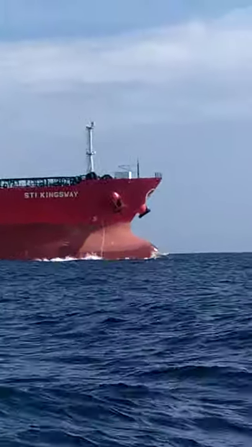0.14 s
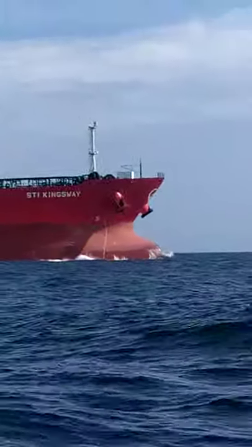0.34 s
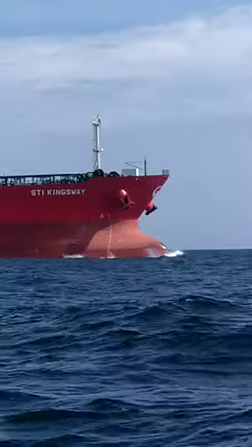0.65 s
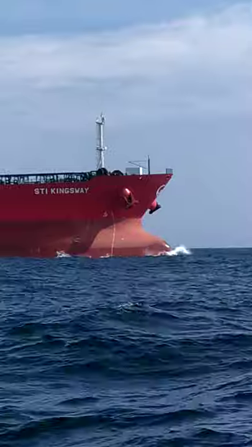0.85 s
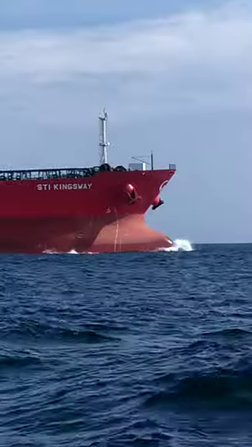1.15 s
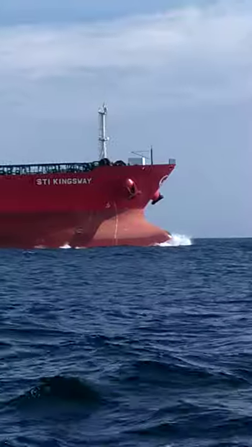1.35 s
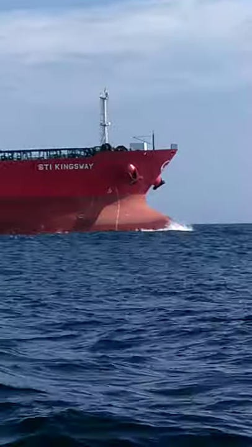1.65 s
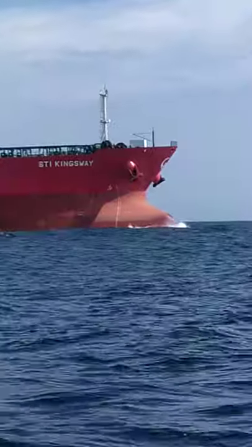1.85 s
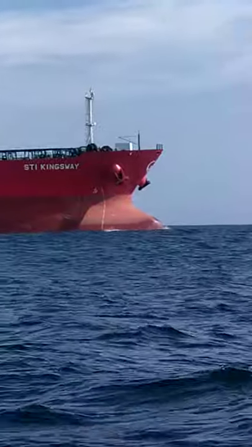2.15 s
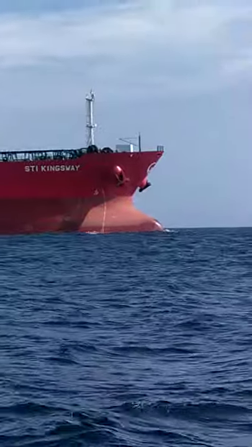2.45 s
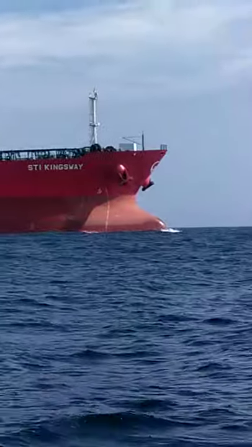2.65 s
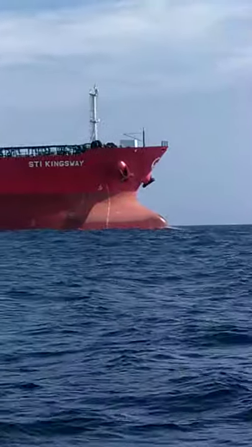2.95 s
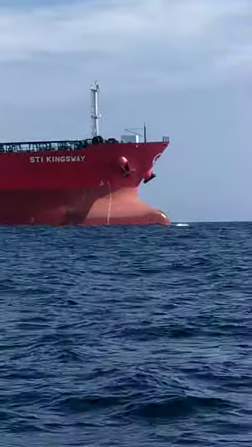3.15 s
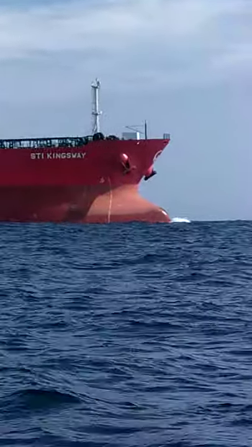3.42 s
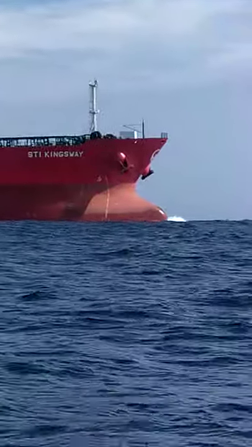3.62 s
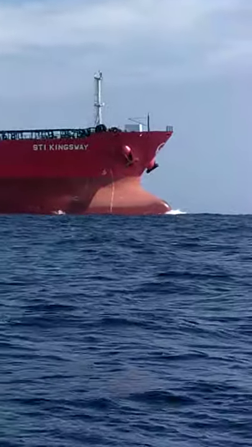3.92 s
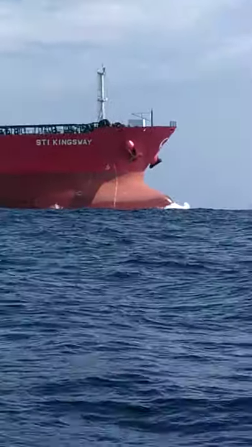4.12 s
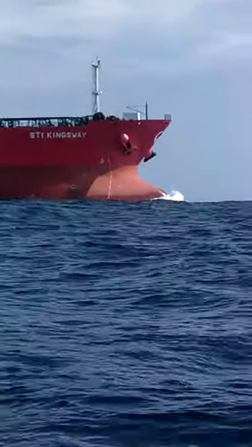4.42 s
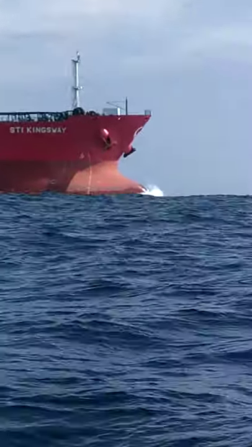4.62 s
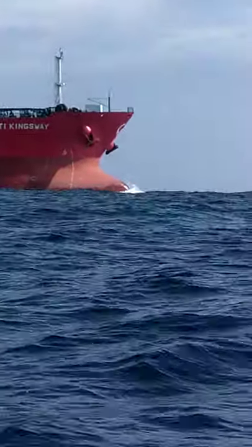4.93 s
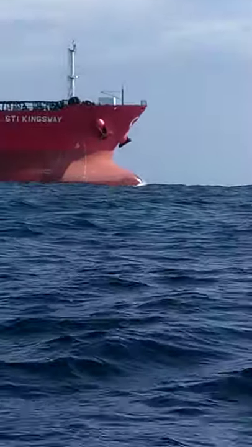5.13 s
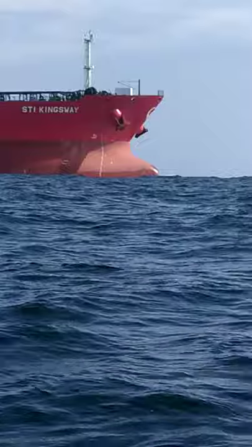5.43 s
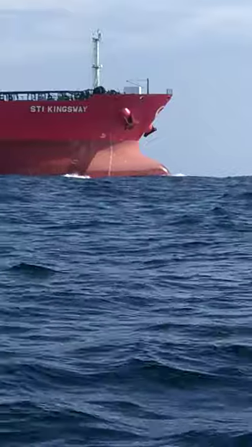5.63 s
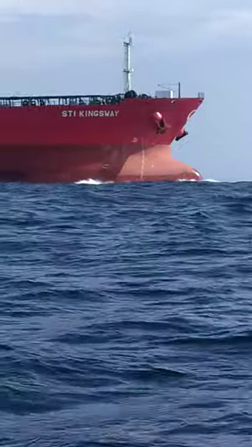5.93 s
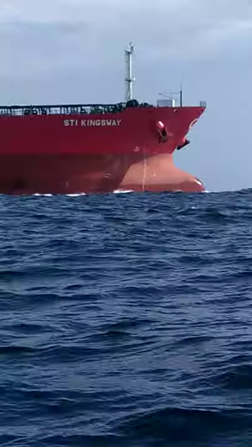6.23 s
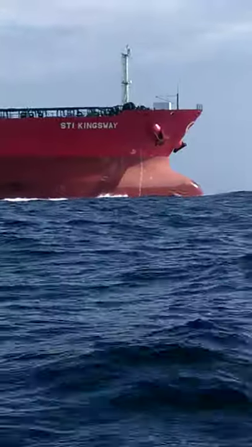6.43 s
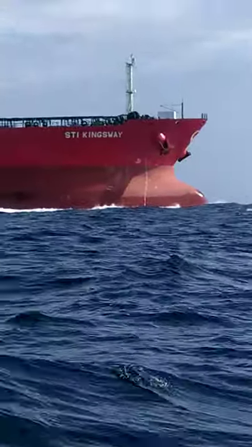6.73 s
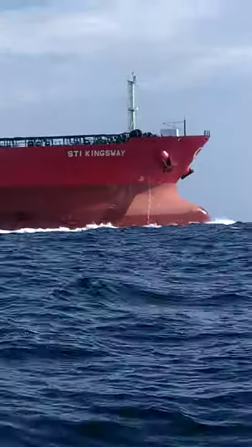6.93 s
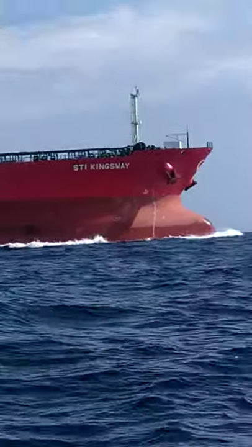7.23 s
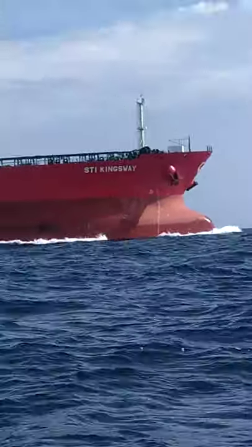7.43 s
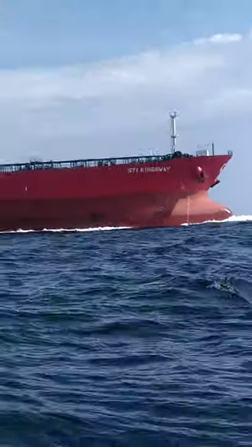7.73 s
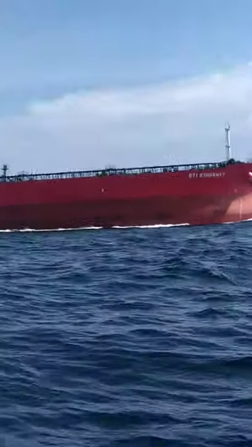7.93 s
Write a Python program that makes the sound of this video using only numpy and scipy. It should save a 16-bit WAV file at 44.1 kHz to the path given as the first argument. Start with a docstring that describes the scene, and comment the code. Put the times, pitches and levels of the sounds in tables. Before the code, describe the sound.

A tanker's deep horn sounds two long blasts across open sea while wind buffets the microphone and a small boat engine drones over hissing water.

```python
"""Open sea, heard from a small motor boat: a tanker sounds two long horn blasts, each a sum of harmonics.
One blast is under way at the start and the other still sounds at the end. The engine drones in low tones
and its knocks ring damped resonances; filtered noise makes water hiss along the hull. Wind turbulence
buffets two microphone ports, mostly one at a time; surges pin a capsule now and then and gain control ducks
that channel. Pops, drops of spray, one splash and a squeaking loose panel come and go."""
import sys
import numpy as np
from scipy import signal
from scipy.fft import rfft, irfft, next_fast_len
from scipy.io import wavfile
from scipy.ndimage import uniform_filter1d

SR = 44100
rng = np.random.default_rng(int(sys.argv[2]) if len(sys.argv) > 2 else 0)


def materialize(psi):
    """Save the field psi as 16-bit PCM at rate SR to the path in sys.argv[1].

    A 1-D psi becomes a single channel; in a 2-D psi each row is a channel.
    """
    bounded = np.clip(np.atleast_2d(psi).T, -1, 1)
    quanta = np.round(bounded * 32767).astype(np.int16)
    wavfile.write(sys.argv[1], SR, quanta)


N = 355887

# Levels are source settings, before placement and the microphone. Port 0 is left, 1 is right.
# Horn blasts: start_s, end_s
HORN_BLASTS = [(-1.0, 2.62), (5.0, 9.0)]
# Horn harmonics: multiple, level_db
HORN_HARMONICS = [(1, 0), (2, -9), (3, -20.5), (4, -30.5), (5, -30.5), (6, -38)]
# Horn partials swimming as sound crosses the water: time_s, level_db,
# second_db and third_db (harmonics above their usual share)
HORN_CROSSING = [(0, -13, 0, 0), (.3, -5, 0, -5), (.65, -5.5, -4, 2), (1.0, -10.5, 0, -3),
                 (1.4, -6, -17, -19), (1.8, -11.5, -6, 2.5), (2.1, -3.5, -5.5, 5), (2.4, -8.5, -13, -5),
                 (2.6, -6.5, -10.5, -6), (5.0, -11.5, 4, -2), (5.3, -4.5, -2, -10), (6.1, -8.5, 0, -4),
                 (6.9, -8.5, -1.5, -5), (7.3, -5.5, -4, -1), (7.7, -9, 0.8, -1), (8.07, -4.5, -3, -5)]
HORN_HZ, HORN_RISE_DB_PER_S, HORN_FALL_DB_PER_S = 135.65, 808, 240

# Engine speed as the boat climbs and drops off the swell: time_s, firings_per_s
ENGINE_SPEED = [(0, 67.3), (1, 66.9), (1.25, 60.5), (1.6, 60.5), (1.95, 67.4), (2.72, 65.7), (3, 63.7),
                (3.38, 63.5), (3.68, 65.8), (3.9, 66.2), (4.33, 65.7), (4.5, 64), (4.8, 57.1), (5.03, 57.2),
                (5.33, 59.6), (5.58, 60.1), (5.85, 61.1), (6.45, 60.5), (6.65, 57.5), (6.95, 43),
                (7.25, 48.7), (7.75, 51.9), (8.07, 52.5)]
# Engine parts: time_s, load_db, block_knock_db, hatch_ring_db
ENGINE_LEVELS = [(0, -19.5, -30.5, -39), (.6, -16, -28.5, -37), (1.15, -17.5, -28, -58),
                 (1.6, -19.5, -32.5, -38), (2.1, -16, -24.5, -53), (2.45, -13, -33.5, -57),
                 (2.75, -17, -31, -44), (3.1, -24, -29, -55), (3.3, -22, -29, -52),
                 (3.55, -18.5, -29.5, -48), (3.8, -17, -30, -46), (4.05, -15, -29.5, -42),
                 (4.4, -24, -34, -48), (4.7, -22, -33, -39), (4.95, -22, -30, -39.5),
                 (5.2, -20, -30.5, -34), (5.6, -19, -32, -35), (5.8, -23.5, -31.5, -37),
                 (6.4, -28, -32.5, -40), (6.8, -24, -46, -53), (7.15, -24, -32.5, -41),
                 (7.6, -33, -33, -42), (7.9, -30, -28.5, -38), (8.07, -12, -45, -50)]
# Low engine tones beside the boom: multiple (of the firing rate), level_db (re load)
ENGINE_TONES = [(1, 1.5), (3, -18), (4, -37)]
# Cowling tick swelling and fading: time_s, relative_level_db
COWLING_TICK = [(0.0, -39), (1.26, -45), (1.41, -38.5), (2.63, -40.5), (2.79, -33.5), (2.94, -39),
                (3.14, -42), (3.26, -33), (3.35, -43), (3.64, -38), (4.16, -41), (4.4, -36), (4.72, -46.5),
                (4.92, -41.5), (5.57, -45.5), (5.72, -37.5), (6.05, -37), (6.12, -38), (6.22, -36.5),
                (6.35, -44.5), (6.63, -45), (6.65, -70), (6.79, -69), (6.97, -54), (7.35, -43), (7.48, -57),
                (7.55, -45), (7.91, -42.5), (8.02, -59), (8.07, -42)]
# Resonances of the engine block: frequency_hz, width_hz, level_db
BLOCK_MODES = [(347, 64, -3), (400, 62, 1), (462, 60, 0.5), (530, 60, -6), (600, 70, -6), (710, 95, -0.5),
               (775, 74, -9)]
# Resonances of the hatch: frequency_hz, width_hz, level_db
HATCH_MODES = [(1368, 45, 0), (1312, 55, 0), (1255, 50, -1)]
# Resonances of the deck boards: frequency_hz, width_hz, level_db
DECK_MODES = [(1080, 55, -3), (1170, 26, 0), (1577, 67, -8), (1625, 62, 5)]
# Resonances of the cowling: frequency_hz, width_hz, level_db
COWLING_MODES = [(2213, 62, 0), (2275, 50, -8)]
# The exhaust pipe booms when twice the firing rate meets its resonance
BOOM_DB, BOOM_HZ, BOOM_WIDTH_HZ = -17, 117.2, 13.8
HULL_CUT_HZ = 2200  # the hull muffles the engine above this
# For a while the deck boards hum along
DECK_FROM_S, DECK_TO_S, DECK_DB = 3.4, 4.21, -40.5
DECK_RISE_DB_PER_S, DECK_FALL_DB_PER_S = 14, 58

# Wind strength at the ports between gusts: time_s, level_db
WIND_STRENGTH = [(0, -12.5), (.6, -12), (1.0, -9.5), (1.5, -5.5), (1.9, -11), (2.3, -13), (2.9, -9),
                 (3.5, -18), (3.95, -14), (4.15, -12.5), (4.4, -13), (4.85, -16), (5.15, -10.5), (5.5, -17),
                 (5.85, -13.5), (6.3, -15), (6.7, -17), (7.3, -16), (8.07, -11.5)]
# Gusts that thump one port: peak_time_s, peak_db, port
PORT_GUSTS = [(.09, -1.5, 0), (.703, 1.5, 1), (.818, -6.5, 0), (.818, 2, 1), (.983, 0.5, 1), (1.083, -7, 1),
              (1.2, 3, 0), (1.292, 4.5, 0), (1.292, 3, 1), (1.407, 2, 1), (1.726, 2.5, 0), (1.826, 3.5, 1),
              (1.911, 3, 0), (2.16, -2, 0), (2.205, 1.5, 1), (2.325, -1.5, 1), (2.514, -2, 0),
              (2.629, -0.5, 0), (2.799, -4.5, 0), (2.903, -0.8, 0), (3.033, -11, 1), (3.133, -3, 1),
              (3.264, -1, 1), (3.367, -6.5, 0), (3.367, -2.5, 1), (3.622, 0.5, 0), (3.687, -10, 1),
              (3.806, -3.5, 0), (4.185, -1.5, 1), (4.33, -12, 1), (4.495, -16, 0), (4.495, -3, 1),
              (4.704, -6.5, 0), (5.453, -8, 1), (6.076, 0.5, 1), (6.136, -2.5, 0), (6.44, -6.5, 0),
              (6.899, -2, 1), (7.588, -2.5, 1), (7.912, -10, 0)]
# Spectrum of the wind rumble: frequency_hz, relative_db_per_hz
RUMBLE_SPECTRUM = [(8, 2.5), (25, 6.5), (60, 4.5), (110, 4), (200, -2.5), (400, -11), (800, -25),
                   (1600, -40), (4000, -57)]
WIND_WANDER_DB, WIND_WANDER_HZ = 4, 3.7
GUST_RISE_DB_PER_S, GUST_FALL_DB_PER_S = 150, 156

# Water along the hull: time_s, wash_db, spray_hiss_db
WATER_LEVELS = [(0, -25.5, -35), (.65, -25.5, -32), (1.1, -29.5, -37), (1.7, -30.5, -35),
                (2.0, -25.5, -33.5), (2.7, -27.5, -34.5), (3.35, -31, -35), (3.6, -27.5, -34.5),
                (4.1, -26, -33), (4.75, -32, -37), (5.3, -28.5, -34), (6.8, -33.5, -38.5),
                (7.4, -31, -37.5), (7.85, -29.5, -36), (8.07, -36, -39.5)]
# Spectrum of the wash: frequency_hz, relative_db_per_hz
WASH_SPECTRUM = [(300, -17), (480, 0), (620, -4), (750, -4), (950, -8), (1250, -3), (1450, -8.5),
                 (1650, -8), (1950, -8.5), (2300, -10.5), (2650, -18.5), (3300, -27.5), (5000, -55),
                 (9000, -62)]
# Spectrum of the spray hiss: frequency_hz, relative_db_per_hz
SPRAY_SPECTRUM = [(1760, -15), (3000, -5), (3930, -10.5), (4290, -11.5), (6210, -9), (10900, -14.5),
                  (13700, -21), (14600, -30), (15000, -43)]
# Left-right likeness of the water: frequency_hz, correlation
WATER_LIKENESS = [(250, 0.65), (1000, 0.95), (2000, 1), (4000, 0.047), (12000, 0.033)]

# Pressure surges that pin one capsule to its stop: start_s, length_ms, port
PRESSURE_SURGES = [(0.0484, 5.5, 0), (0.8576, 6.0, 0), (0.8755, 9.0, 0), (1.0616, 7.5, 0), (1.082, 13.0, 0),
                   (1.2112, 5.5, 0), (1.4866, 7.0, 0), (1.5914, 5.5, 0), (1.6747, 5.5, 0), (1.8194, 6.0, 1),
                   (1.8348, 10.5, 1), (1.9311, 6.0, 0), (2.1526, 6.0, 0), (2.187, 6.0, 0), (2.877, 5.5, 0),
                   (3.0107, 6.5, 0), (3.3065, 9.5, 0), (3.3743, 11.0, 0), (3.5559, 7.0, 0),
                   (3.6976, 7.0, 0), (3.7874, 6.0, 0), (3.962, 7.5, 0), (6.0732, 11.5, 1)]
# Sharp pops of air in one port: start_s, drive_db, port
AIR_POPS = [(0.8142, 3, 1), (0.8178, -3, 0), (0.6978, -3, 1), (0.823, 4, 1), (1.0337, 4, 0),
            (1.058, 5.5, 0), (1.1277, -3, 1), (1.139, -2, 1), (1.2565, 3, 1), (1.4335, 6, 1),
            (4.0883, 5, 0), (4.4668, 1, 1), (1.2975, 11, 0), (1.388, -3, 0), (1.4945, 12.5, 0),
            (1.731, 12, 0), (1.781, 9.5, 1), (1.852, 13, 1), (1.8577, 7, 0), (1.8743, 5, 1), (1.9032, 9, 0),
            (2.1601, 5, 0), (2.7695, -2, 0), (3.1431, 1.5, 1), (3.2668, 12, 1), (3.2688, 15, 1),
            (3.2722, 3, 1), (3.278, 5, 1), (3.3049, 13.5, 1), (4.173, 10, 1), (4.19, 6, 1), (4.232, -1, 1),
            (4.6903, 2, 0), (6.0567, 5, 1), (6.142, 11.5, 0), (6.8588, 7, 0)]
# Spray drops on deck: start_s, drive_db
SPRAY_DROPS = [(1.0959, -40), (2.167, -42), (3.3154, -30), (3.7045, -32), (3.8382, -26), (4.1704, -31),
               (5.005, -25), (5.1325, -22.5)]
# A sheet of spray comes over the side
SPLASH_FROM_S, SPLASH_TO_S, SPLASH_DB = 5.005, 5.14, -34
SPLASH_RISE_DB_PER_S, SPLASH_FALL_DB_PER_S = 500, 150

# Squeaks of a loose panel as the engine picks up: start_s, length_ms, pitch_hz, level_db, rattle_db
PANEL_SQUEAKS = [(7.059, 20, 1300, -36, -48), (7.102, 24, 1320, -39, -41), (7.15, 26, 1340, -31, -36),
                 (7.195, 20, 1320, -23.5, -28), (7.225, 24.6, 1325, -32, -38), (7.27, 22, 1350, -25.5, -36),
                 (7.343, 17, 1352, -28, -32), (7.368, 10, 1345, -30, -30), (7.383, 32, 1338, -26.5, -29),
                 (7.445, 32, 1352, -26, -28), (7.51, 17, 1340, -28.5, -31), (7.546, 13, 1345, -28, -33),
                 (7.57, 30, 1365, -25.5, -27), (7.625, 20, 1350, -33, -40), (7.659, 15, 1340, -36, -40),
                 (7.69, 25, 1335, -32, -35), (7.734, 23, 1330, -32, -32), (7.806, 25, 1320, -39, -30.5),
                 (7.873, 21, 1320, -43, -30), (7.928, 20, 1310, -42, -33)]
# Side tones of a squeak: multiple (of the pitch), relative_level_db
SQUEAK_SIDE_TONES = [(0.915, -4.0), (1.145, 1.0), (1.27, 0.0), (1.33, -5.0)]
# Resonances of the panel rattle: frequency_hz, width_hz, level_db
PANEL_MODES = [(1517, 70, -5), (1723, 79, -2), (1790, 110, -8), (1190, 110, -3)]
SQUEAK_RISE_DB_PER_S, SQUEAK_FALL_DB_PER_S, SQUEAK_THROB_DB = 2500, 1300, 2.5
SQUEAK_BEND_HZ_PER_DB = 2.0  # the pitch climbs as a squeak swells and sags as it dies

CAPSULE_STOP, CUTOFF_HZ = 1.25, 15600  # amplitude limit; edge of the final low-pass


def amp(db):
    """Decibel law: amplitude gain of a level in dB."""
    return 10 ** (np.asarray(db) / 20)


def rms_one(x):
    """Power normalisation: each channel scaled to rms 1."""
    return x / np.sqrt(np.mean(x ** 2, axis=-1, keepdims=True) + 1e-20)


def in_time(rows):
    """Linear interpolation: the columns of a curve table, one value a sample."""
    time_s, *columns = np.transpose(rows)
    return [np.interp(np.arange(N) / SR, time_s, column) for column in columns]


def at_hz(points, hz):
    """Logarithmic interpolation: a frequency table read on a log axis."""
    table_hz, values = np.array(points).T
    return np.interp(np.log(hz), np.log(table_hz), values)


def drift(rate_hz):
    """Slow random fluctuation: noise low-passed twice, of spread 1."""
    step = 40  # samples between drawn values
    pole = np.exp(-2 * np.pi * step * rate_hz / SR)
    noise = rng.standard_normal(N // step + 2002)
    slow = signal.lfilter([1], [1, -2 * pole, pole * pole], noise)[2000:]
    return np.interp(np.arange(N) / step, np.arange(len(slow)), rms_one(slow))


def tent(start_s, end_s, rise_db_per_s, fall_db_per_s):
    """Exponential growth and decay: in dB a straight rise to 0, a hold, a straight fall."""
    t = np.arange(N) / SR
    rise = rise_db_per_s * (t - start_s)
    fall = fall_db_per_s * (end_s - t)
    return np.minimum(0, np.minimum(rise, fall))


def resonate(x, modes):
    """Modal resonance: parallel damped modes, each passed twice so that rings swell softly."""
    out = 0
    for hz, width_hz, level_db in modes:
        pole = np.exp(-np.pi * width_hz / SR)
        section = [1, 0, -1, 1, -2 * pole * np.cos(2 * np.pi * hz / SR), pole * pole]
        ring = signal.sosfilt([section, section], x + 1e-18)
        out = out + amp(level_db) * rms_one(ring)
    return out


def coloured(spectrum, channels):
    """Spectral shaping: independent noises of a given spectrum, at rms 1."""
    size = next_fast_len(N)
    hz = np.maximum(np.fft.rfftfreq(size, 1 / SR), 1)
    white = rfft(rng.standard_normal((channels, size)))
    return rms_one(irfft(white * amp(at_hz(spectrum, hz)), size)[:, :N])


def band_noise(order, edges_hz):
    """Band-pass filtering: two independent channels of noise between two frequencies."""
    band = signal.butter(order, edges_hz, "band", fs=SR, output="sos")
    return rms_one(signal.sosfilt(band, rng.standard_normal((2, N))))


def placed(x, pan_db, lag_s):
    """Point-source localisation: left-over-right level, and the lag of the right channel."""
    right = np.interp(np.arange(N) - lag_s * SR, np.arange(N), x)
    return np.array([x * amp(pan_db / 2), right * amp(-pan_db / 2)])


def horn():
    """Harmonic series of a diaphragm tone; the air over the water makes each harmonic waver."""
    phase = 2 * np.pi * np.cumsum(HORN_HZ + 0.15 * drift(1.0)) / SR
    level_db, second_db, third_db = in_time(HORN_CROSSING)
    out = 0
    for start_s, end_s in HORN_BLASTS:
        shape_db = level_db + tent(start_s, end_s, HORN_RISE_DB_PER_S, HORN_FALL_DB_PER_S)
        for k, share_db in HORN_HARMONICS:
            waver_db = .35 * k * drift(2.5)
            swim_db = (k == 2) * second_db + (k == 3) * third_db
            gain = amp(shape_db + share_db + swim_db + waver_db)
            out = out + gain * np.sqrt(2) * np.sin(k * phase)
    return placed(out, pan_db=1.3, lag_s=-0.00022)


def engine():
    """Periodic excitation of resonances: firing tones, and uneven knocks ringing the boat's parts."""
    per_s, = in_time(ENGINE_SPEED)
    load_db, block_db, hatch_db = in_time(ENGINE_LEVELS)
    tick_db, = in_time(COWLING_TICK)
    cycles = np.cumsum(per_s + .08 * drift(3.0)) / SR  # firings so far

    boom_db = BOOM_DB - 10 * np.log10(1 + ((2 * per_s - BOOM_HZ) / BOOM_WIDTH_HZ) ** 2)
    low = amp(boom_db + 0.9 * drift(3.2)) * np.sqrt(2) * np.sin(4 * np.pi * cycles)
    for k, share_db in ENGINE_TONES:
        gain = amp(load_db + share_db + 2.6 * drift(8.3))
        low += gain * np.sqrt(2) * np.sin(2 * np.pi * k * cycles)

    fired = np.diff(np.floor(cycles), prepend=0)
    weak = np.floor(cycles) % 2  # every second firing is softer
    knocks = rms_one(fired * amp(-7.0 * weak + .6 * rng.standard_normal(N)))
    taps = rms_one(fired * amp(-9.0 * weak + 2.0 * rng.standard_normal(N)))
    # gas noise swells once a turn, that is, every two firings
    hiss = rms_one(np.exp(0.2 * np.cos(np.pi * cycles)) * rng.standard_normal(N))

    block = 0
    for mode in BLOCK_MODES:
        block = block + amp(block_db + 1.5 * drift(2.0)) * resonate(knocks + .04 * hiss, [mode])
    hatch_ring = resonate(fired * amp(-2.5 * weak) + .003 * hiss, HATCH_MODES)
    hatch = amp(hatch_db + 1.0 * drift(3.0)) * rms_one(hatch_ring)
    deck_db = DECK_DB + tent(DECK_FROM_S, DECK_TO_S, DECK_RISE_DB_PER_S, DECK_FALL_DB_PER_S)
    deck = amp(deck_db) * resonate(knocks, DECK_MODES)
    cowling = amp(tick_db - 2.5) * resonate(taps + .25 * hiss, COWLING_MODES)

    hull = signal.butter(2, HULL_CUT_HZ, fs=SR, output="sos")
    muffled = signal.sosfilt(hull, low + block + deck + hatch)
    return placed(muffled, pan_db=5.5, lag_s=.0001) + placed(cowling, pan_db=-15.0, lag_s=-0.000076)


def wind():
    """Turbulent pressure, separate on each port and deeper on the windward left; strong gusts brighten."""
    wander = np.array([drift(WIND_WANDER_HZ), drift(WIND_WANDER_HZ)])
    gust_db = in_time(WIND_STRENGTH) + WIND_WANDER_DB * wander
    for s, peak_db, port in PORT_GUSTS:
        side = round(port)
        thump_db = peak_db + tent(s, s, GUST_RISE_DB_PER_S, GUST_FALL_DB_PER_S)
        gust_db[side] = np.maximum(gust_db[side], thump_db)
    lumps = np.array([drift(14.2), drift(20.0)])
    flicker = np.array([drift(40.0), drift(37.0)])
    low = coloured(RUMBLE_SPECTRUM, channels=2) * amp([[2.5], [-2.0]])
    bright = band_noise(2, [250, 950])
    # the bright part grows 1.9 dB per dB of gust, up to a cap
    bright_db = np.minimum(-20.5 + 1.9 * gust_db + 4.0 * lumps + 2.7 * flicker, -12)
    return amp(gust_db + 3.1 * lumps) * low + amp(bright_db) * bright


def water(spectrum, level_db, patchy_db, shared, lag_s=.00011):
    """Partial stereo coherence: half-octave bands of noise that flicker partly together."""
    out, together = 0, drift(24.0)
    edges_hz = 250 * 2 ** np.arange(0, 6.1, .5)
    white = coloured(spectrum, channels=4).reshape(2, 2, N)  # neighbouring bands use unrelated pairs
    for k, (low, high) in enumerate(zip(edges_hz, edges_hz[1:])):
        band = signal.butter(2, [low, high], "band", fs=SR, output="sos")
        mid, side = signal.sosfilt(band, white[k % 2])
        alike = np.clip(at_hz(WATER_LIKENESS, np.sqrt(low * high)), -1, 1)
        stereo = np.sqrt(1 + alike) * mid + np.sqrt(1 - alike) * side * [[1], [-1]]
        out = out + amp(patchy_db * (shared * together + drift(30.0))) * stereo
    out = np.array([out[0], np.roll(out[1], round(lag_s * SR))])  # the hull lies to the left
    return amp(level_db) * rms_one(out)


def hull_water():
    """Superposition of two broadband flows: the wash and the higher spray hiss, both leaning left."""
    wash_db, spray_db = in_time(WATER_LEVELS)
    wash = water(WASH_SPECTRUM, wash_db, patchy_db=0.98, shared=0.74)
    spray = water(SPRAY_SPECTRUM, spray_db, patchy_db=1.16, shared=0.19)
    return wash * amp([[2.0], [-2.0]]) + spray * amp([[.3], [-.3]])


def surges():
    """Quasi-static overload: pressure builds, holds the capsule at its stop, and drops off."""
    out, t = np.zeros((2, N)), np.arange(N) / SR
    for s, length_ms, port in PRESSURE_SURGES:
        end = s + length_ms / 1000
        push = np.interp(t, [s - .008, s + .002, end - .001, end + .0006], [0, 1, 1, 0])
        out[round(port)] += push * rng.choice([-1, 1])  # inward or outward
    return 1.45 * CAPSULE_STOP * out


def pops():
    """Heavily damped oscillation: one swing of the air in the port."""
    marks = np.zeros((2, N))
    for s, drive_db, port in AIR_POPS:
        marks[round(port), round(s * SR)] = amp(drive_db)
    t = np.arange(300) / SR
    swing = np.cos(2 * np.pi * 700 * t) * np.exp(-t / 0.00086) * np.minimum(t / 0.00034, 1)
    soften = signal.butter(2, 1900, fs=SR, output="sos")
    return signal.sosfilt(soften, signal.lfilter(swing, [1], marks))


def drops():
    """Impulsive excitation: short bright ticks of exponentially decaying noise."""
    marks = np.zeros(N)
    for s, drive_db in SPRAY_DROPS:
        marks[round(s * SR)] = amp(drive_db)
    decay = signal.lfilter([1], [1, -np.exp(-1 / (0.0033 * SR))], marks)  # 3.3 ms time constant
    return band_noise(1, [5000, 13000]) * decay


def splash():
    """Broadband radiation: a brief, very bright hiss that flickers."""
    shape_db = tent(SPLASH_FROM_S, SPLASH_TO_S, SPLASH_RISE_DB_PER_S, SPLASH_FALL_DB_PER_S)
    return amp(SPLASH_DB + shape_db + 1.5 * drift(30.0)) * band_noise(2, [7500, 15000])


def panel():
    """Frequency-modulated vibration: throbbing, bent squeaks with side tones and a noisy rattle."""
    starts, _, pitches, _, _ = np.transpose(PANEL_SQUEAKS)
    tone_db = rattle_db = swell_db = -200  # silent between squeaks
    for s, length_ms, _, level_db, upper_db in PANEL_SQUEAKS:
        shape_db = tent(s, s + length_ms / 1000, SQUEAK_RISE_DB_PER_S, SQUEAK_FALL_DB_PER_S)
        tone_db = np.maximum(tone_db, level_db + shape_db)
        rattle_db = np.maximum(rattle_db, upper_db + shape_db)
        swell_db = np.maximum(swell_db, shape_db)
    bend_hz = SQUEAK_BEND_HZ_PER_DB * uniform_filter1d(np.maximum(swell_db, -20), size=600)
    pitch_hz, = in_time(list(zip(starts, pitches)))
    phase = 2 * np.pi * np.cumsum(pitch_hz + bend_hz + 12.0 * drift(18.0)) / SR
    out = amp(tone_db + SQUEAK_THROB_DB * drift(70.0)) * np.sqrt(2) * np.sin(phase)
    for multiple, share_db in SQUEAK_SIDE_TONES:
        slide = 2 * np.pi * np.cumsum(30.0 * drift(10.0)) / SR
        gain = amp(rattle_db + share_db - 6.0 + 4.4 * drift(22.0))
        out += gain * np.sin(multiple * phase + slide)
    flurry = amp(rattle_db)
    rattle = resonate(flurry * rng.standard_normal(N), PANEL_MODES)
    out += 0.5 * np.sqrt(np.mean(flurry ** 2)) * rattle
    return placed(out, pan_db=4.0, lag_s=.0001)


def scene():
    """Linear superposition: all sources summed at the two ports."""
    steady = horn() + engine() + wind() + hull_water()
    return steady + surges() + pops() + drops() + splash() + panel()


def held_down(x, top_db, ratio, release_db_per_s, smoothing_s):
    """Dynamic compression: each channel's excess level is squeezed, then let go at a steady rate."""
    over_db = ratio * np.maximum(20 * np.log10(np.abs(x) + 1e-9) - top_db, 0)
    ramp_db = release_db_per_s * np.arange(N) / SR
    cut_db = np.maximum.accumulate(over_db + ramp_db, axis=1) - ramp_db
    size = max(int(smoothing_s * SR), 1)
    return x * amp(-uniform_filter1d(cut_db, size, axis=1))


def record(dry):
    """Limiting and filtering: capsules clip, gain ducks, rumble is cut, peaks are rounded, the top is cut."""
    x = dry / (1 + (dry / CAPSULE_STOP) ** 16) ** (1 / 16)
    x = held_down(x, top_db=-5.0, ratio=.8, release_db_per_s=130, smoothing_s=.004)
    low_cut = signal.butter(4, 52, "high", fs=SR, output="sos")
    x = signal.sosfilt(low_cut, x - x[:, :1])  # start from zero
    ceiling = .74
    x = x / (1 + np.abs(x / ceiling) ** 10) ** (1 / 10)
    x = signal.sosfilt(signal.butter(4, 13500, fs=SR, output="sos"), x)
    return signal.sosfilt(signal.cheby2(12, 70, CUTOFF_HZ, fs=SR, output="sos"), x)


dry = scene()
out = record(dry)
materialize(out)
```